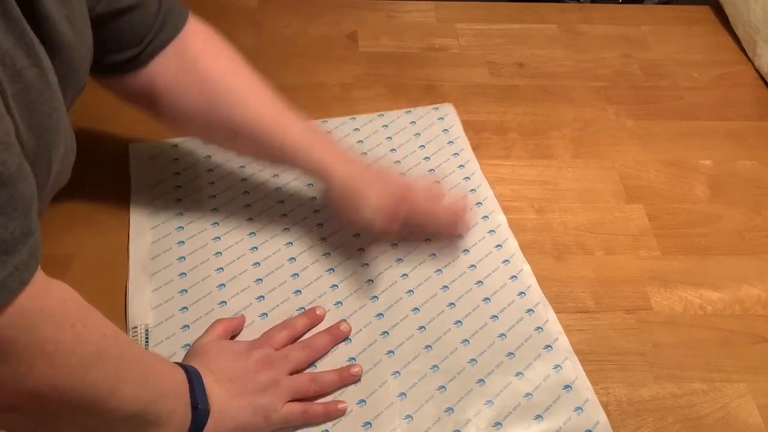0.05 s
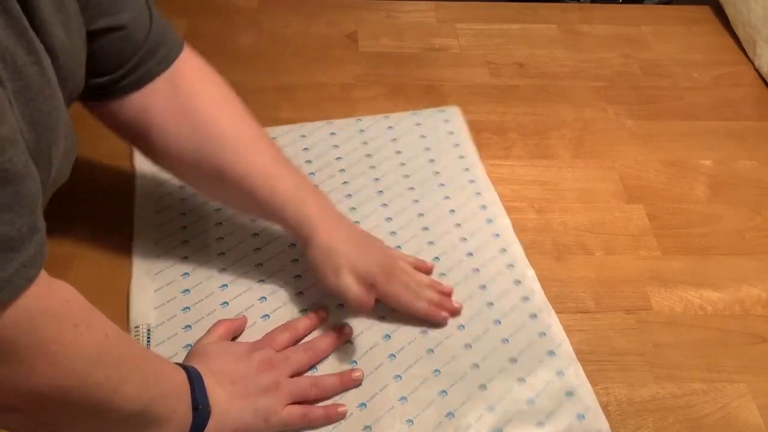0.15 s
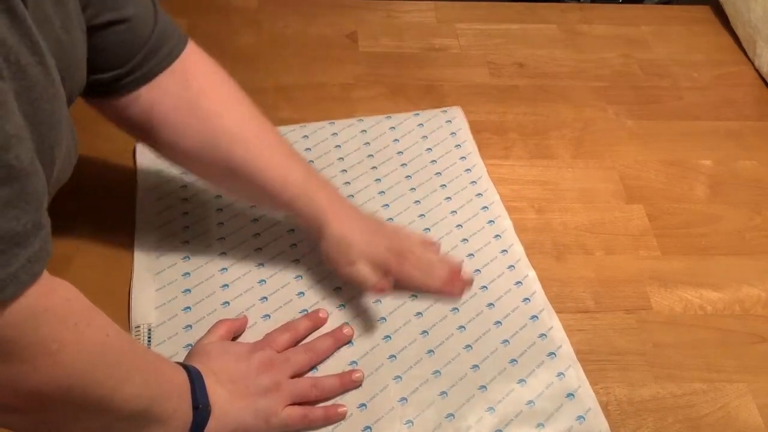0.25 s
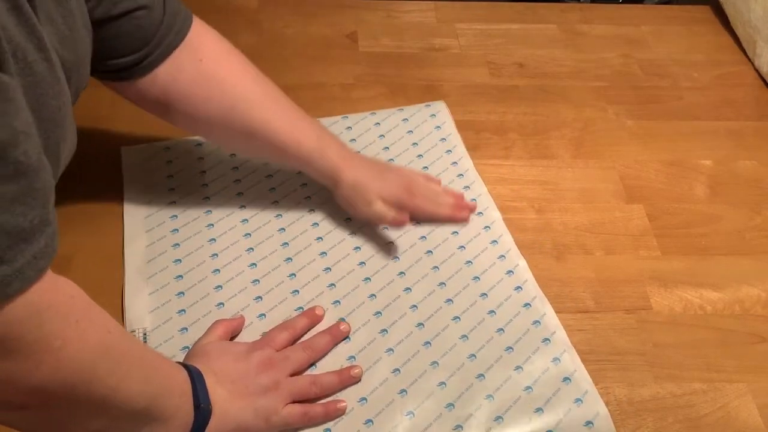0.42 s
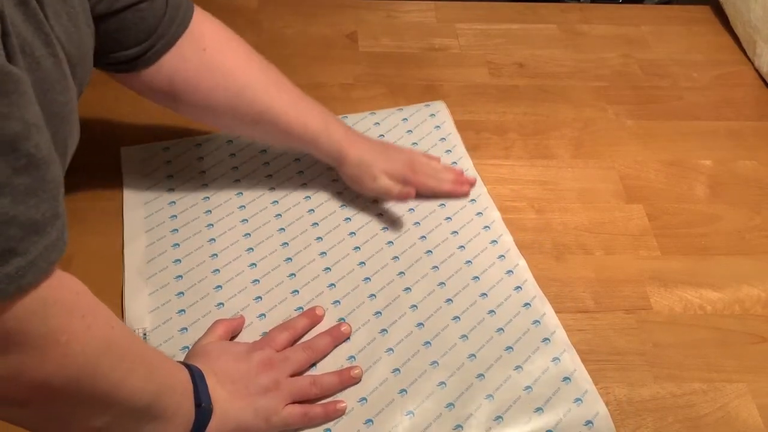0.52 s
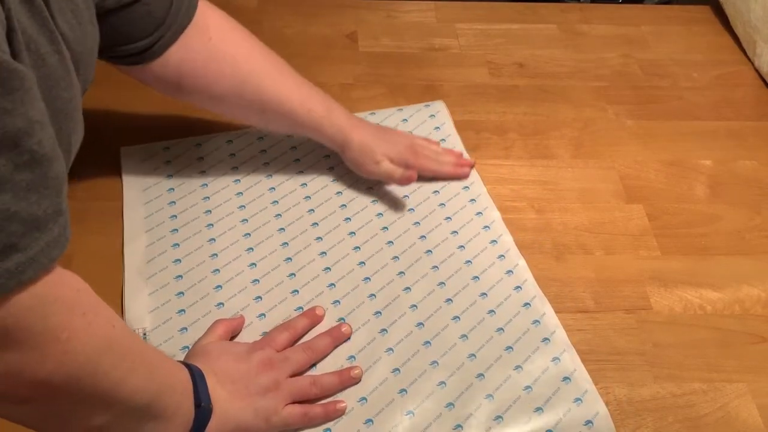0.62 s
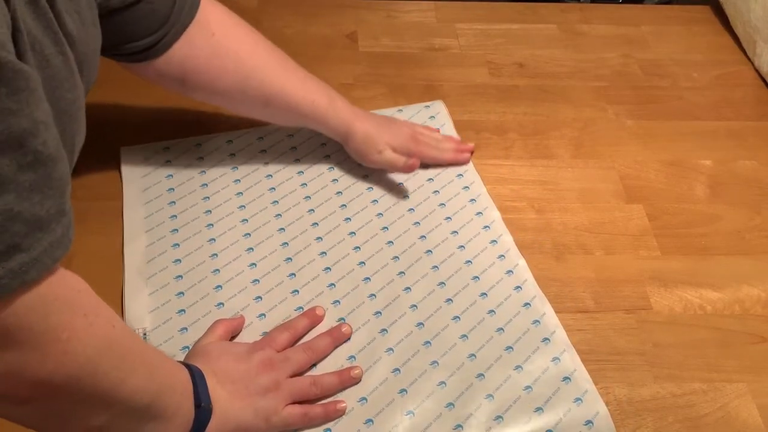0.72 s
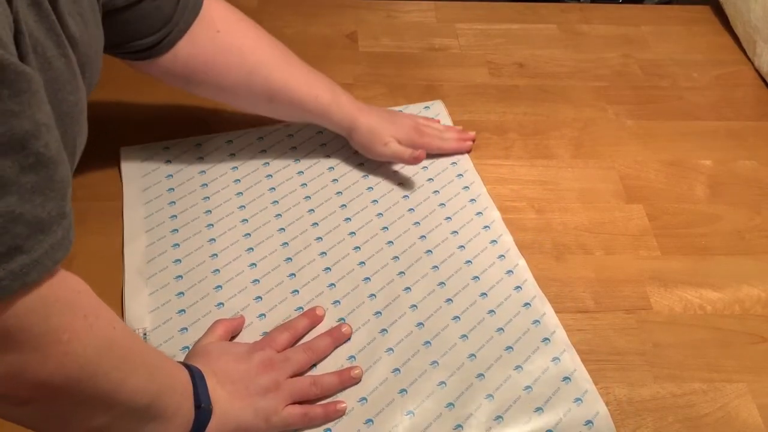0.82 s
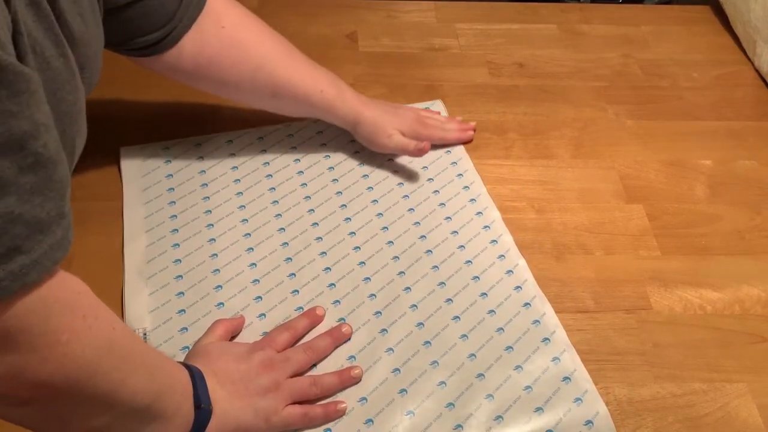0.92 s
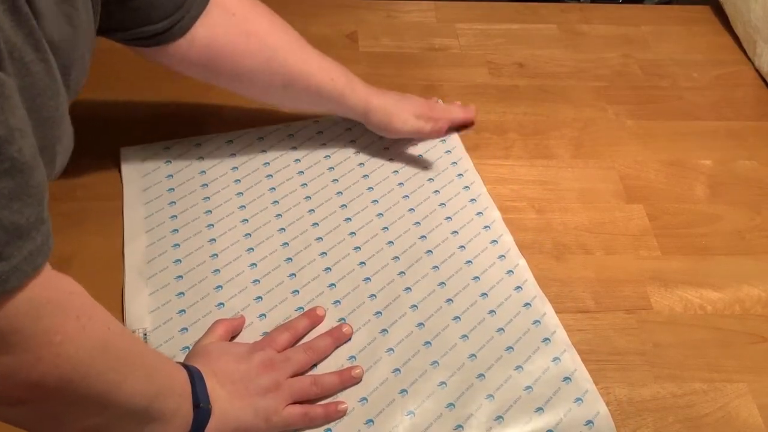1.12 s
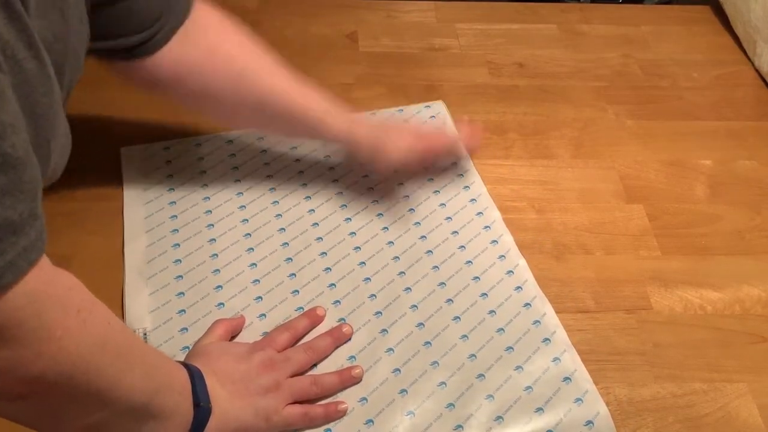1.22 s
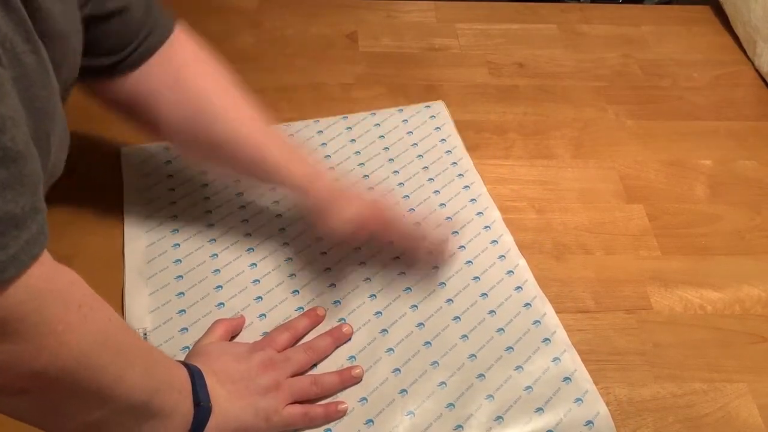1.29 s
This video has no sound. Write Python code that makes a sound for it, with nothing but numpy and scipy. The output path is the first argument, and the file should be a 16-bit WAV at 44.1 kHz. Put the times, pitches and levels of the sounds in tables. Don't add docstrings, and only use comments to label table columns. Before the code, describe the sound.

A palm lands on a thin plastic sheet on a wooden table and sweeps with a bright hiss; creases snap sharply, the rubbing fades, fingertips patter, all close to one microphone in a quiet, faintly humming room.

```python
import sys
import numpy as np
from scipy import signal
from scipy.fft import rfft, irfft, next_fast_len
from scipy.io import wavfile
from scipy.ndimage import uniform_filter1d, map_coordinates

SR = 44100
rng = np.random.default_rng(int(sys.argv[2]) if len(sys.argv) > 2 else 0)


def wrap_up_sound(samples):
    columns = np.atleast_2d(samples).T
    tamed = np.clip(columns, -1, 1)
    steps = np.round(tamed * 32767).astype(np.int16)
    wavfile.write(sys.argv[1], SR, steps)


def boost(x):
    u = np.asarray(x, float) / 20
    return 10 ** u


N = 59535


def unit(x):
    return x / np.sqrt(np.mean(x ** 2) + 1e-20)


def along(points, hz):
    point_hz, value = np.transpose(points)
    return np.interp(np.log(hz + 1), np.log(point_hz + 1), value)


def curves(rows):
    time_s, *columns = np.transpose(rows)
    return [np.interp(np.arange(N) / SR, time_s, column) for column in columns]


def wobble(rate):
    return map_coordinates(rng.standard_normal(200), [np.arange(N) * rate / SR])


def filtered(x, response):
    size = next_fast_len(len(x) + 8192)
    return irfft(rfft(x, size) * response(np.fft.rfftfreq(size, 1 / SR)), size)[:len(x)]


def peak(f, hz, width_hz):
    damping = 1j * f * width_hz
    return damping / (hz * hz - f * f + damping)


def coloured(x, spectrum):
    low_end, high_end = (spectrum[0][0] * .7, -60), (spectrum[-1][0] * 1.015, -120)
    closed = [low_end] + list(spectrum) + [high_end]
    return unit(filtered(x, lambda f: boost(along(closed, f))))


def patchy(depth_db):
    z = signal.stft(rng.standard_normal(N + 512), nperseg=512)[2]
    field = uniform_filter1d(rng.standard_normal(z.shape), size=6, axis=0)
    field = uniform_filter1d(field, size=8, axis=1)
    return unit(signal.istft(z * boost(depth_db * unit(field)), nperseg=512)[1][:N])


def burst(t60):
    count = 1500
    x = rng.standard_normal(count) * boost(-60 * np.arange(count) / SR / t60)
    x[0] = 3.55
    return x


def add(track, s, x):
    part = track[round(s * SR):][:len(x)]
    part += x[:len(part)]


# pitch_hz, level_db (rms), width_hz
HUM_PARTIALS = [(58.9, -71, 7.1), (120.1, -60.5, 4.94), (218.3, -67, 4), (246.2, -68, 13.6),
                (293.8, -71.5, 8), (523, -72, 11)]


def hum():
    t = np.arange(N) / SR
    out = np.zeros(N)
    for hz, db, width_hz in HUM_PARTIALS:
        drift_cycles = np.cumsum(wobble(40.07)) * width_hz / SR
        tone = np.sqrt(2) * np.sin(2 * np.pi * (hz * t + drift_cycles))
        out += boost(db + 0.53 * wobble(11.7)) * tone
    return out


# frequency_hz, level_db (per Hz)
AIR_SPECTRUM = [(28, -25), (55, 0), (95, -2), (160, -7.5), (270, -7.5), (600, -12.5), (1600, -17.5),
                (3700, -27.5)]
AIR_DB = -59.5


def air():
    return boost(AIR_DB + 1.4 * wobble(13.73)) * coloured(patchy(depth_db=1.5), AIR_SPECTRUM)


# frequency_hz, level_db (per Hz)
HISS_SPECTRUM = [(3000, 0), (5000, 5), (9000, -4), (15800, -4)]
HISS_DB = -80


def hiss():
    return boost(HISS_DB) * coloured(patchy(depth_db=0.0), HISS_SPECTRUM)


# time_s, hum_gain_db, air_gain_db
SUPPRESSION = [(0, 3.5, -1.5), (.12, -1.5, 0.5), (.21, -1.5, 1.5), (.3, -7, -1), (.6, -3.5, 0),
               (.8, 0, -1.8), (1.2, -0.8, 0.5), (1.26, -7.5, 1), (1.35, -3, -3)]


def background():
    hum_gain_db, air_gain_db = curves(SUPPRESSION)
    return boost(hum_gain_db) * hum() + boost(air_gain_db) * air() + hiss()


# frequency_hz, t60_s
ROOM_DECAY = [(200, 0.178), (3000, 0.093), (12000, 0.11)]


def room(x):
    hz, t, z = signal.stft(rng.standard_normal(SR // 2), SR, nperseg=256)
    decay = boost(-60 * t / along(ROOM_DECAY, hz)[:, None])
    tail = signal.istft(z * decay, SR, nperseg=256)[1]
    delayed = np.pad(x, (60, 0))
    return signal.fftconvolve(delayed, tail / np.linalg.norm(tail))[:N]


# frequency_hz, level_db (per Hz)
GLITCH_SPECTRUM = [(4050, -40), (4200, -2), (6850, 2), (6950, -42)]
GLITCH_S, GLITCH_LENGTH_S, GLITCH_DB = .556, 0.042, -60.5


def glitch():
    u = np.clip((np.arange(N) / SR - GLITCH_S) / GLITCH_LENGTH_S, 0, 1)
    noise = coloured(rng.standard_normal(N), GLITCH_SPECTRUM)
    return boost(GLITCH_DB) * np.sin(np.pi * u) * noise * [[1], [-1]]


GROAN_S, GROAN_LENGTH_S, GROAN_DB = .77, .12, -58.5
GROAN_FROM_HZ, GROAN_TO_HZ = 218, 260


def groan():
    u = np.clip((np.arange(N) / SR - GROAN_S) / GROAN_LENGTH_S, 0, 1)
    hz = GROAN_FROM_HZ + (GROAN_TO_HZ - GROAN_FROM_HZ) * u
    return boost(GROAN_DB) * np.sin(np.pi * u) * np.sin(2 * np.pi * np.cumsum(hz) / SR)


# start_s, level_db (peak)
THUMPS = [
    (.2485, -46.5),
    (1.186, -53.5),
    (0.48, -54.5),
]
# pitch_hz, level_db, t60_s
TABLE_MODES = [(89, 7.5, 0.12), (191, 0.5, 0.11), (257, 2, 0.086), (300.2, 10, 0.073), (372, 5, 0.06),
               (802, 4.5, 0.032)]


def thumps():
    out, t = np.zeros(N), np.arange(SR // 4) / SR
    ring = sum(boost(db - 60 * t / t60) * np.sin(2 * np.pi * hz * t) for hz, db, t60 in TABLE_MODES)
    ring *= 1 - np.exp(-t / 0.0049)
    for s, db in THUMPS:
        add(out, s, boost(db) * ring)
    return out


# start_s, level_db (peak), nail_brightness_db (per octave)
TAPS = [
    (1.181, -50, -1),
    (1.1817, -40, -2),
    (1.1843, -44.5, 0),
    (1.1858, -49, 0),
    (1.1940, -43, 11),
    (1.1954, -40.5, -4.5),
    (1.1975, -48, -2),
    (1.2060, -49.5, -4),
    (1.2074, -47.5, -8),
]
# pitch_hz, width_hz, level_db
TAP_RESONANCES = [(900, 380, -3.5), (1170, 430, 4.5), (2200, 1200, -11.5), (3400, 780, 2), (4850, 1300, -5),
                  (6570, 1530, -11.5)]
TAP_T60_S, TAP_PIVOT_HZ = 0.0044, 2000


def taps():
    out = np.zeros(N)
    for s, db, tilt_db in TAPS:
        def touch(f):
            total, sign = 0, 1
            for hz, width_hz, level_db in TAP_RESONANCES:
                gain_db = level_db + tilt_db * np.log2(hz / TAP_PIVOT_HZ)
                total = total + sign * boost(gain_db) * peak(f, hz, width_hz) ** 2
                sign = -sign
            return total
        x = filtered(burst(TAP_T60_S), touch)
        add(out, s, boost(db) * x / np.abs(x).max())
    return out


# start_s, level_db (peak),
# pitch_hz, width_hz, t60_s
SNAPS = [(.02255, -39.5, 3000, 3200, .001), (0.0229, -48.5, 6000, 3000, .001),
         (0.0226, -46.5, 1900, 1290, 0.0038), (.2397, -35.5, 2950, 1500, 0.0017),
         (0.2404, -35, 4660, 3500, .002), (0.2438, -39, 2700, 1100, 0.0022),
         (.2447, -43, 1700, 1500, 0.0067), (0.2444, -32, 3630, 1000, 0.0023),
         (.2451, -36.5, 6500, 5040, .003), (.2520, -40, 4800, 2000, .003), (0.2568, -41, 4300, 2000, .003),
         (0.3749, -42, 2600, 2000, .003), (.376, -33, 12500, 5000, .004),
         (.4198, -31.5, 11800, 5000, .0028), (.4225, -35, 10000, 8900, .004),
         (.4240, -24, 8200, 3000, .003), (.42370, -11.5, 9300, 9500, .0006),
         (.4240, -25, 10700, 3000, .003), (.4238, -27, 4900, 2500, .003),
         (0.4247, -23, 10000, 9570, 0.0044), (0.4252, -19, 8500, 7040, .004),
         (0.4261, -28.5, 4400, 1000, .004), (0.4266, -34, 2250, 1020, .010), (0.429, -26, 9500, 8000, .005),
         (0.4277, -29.5, 3400, 1500, .004), (0.4283, -45.5, 1070, 600, 0.0046),
         (0.4305, -26.5, 10500, 8200, .012), (.4316, -39, 4600, 1200, 0.0065),
         (0.441, -35.5, 8300, 1800, 0.0037), (.4763, -28.5, 7800, 3060, .003),
         (.4780, -34.5, 7400, 2000, .002), (.4825, -39.5, 13000, 5020, .002),
         (0.491, -35, 8500, 4000, .002), (0.4907, -31, 5000, 6060, .002), (1.3342, -55.5, 2510, 2540, .004),
         (.2520, -43.5, 300, 130, 0.022), (0.399, -50, 380, 221, 0.025), (.4260, -47.5, 420, 304, 0.02),
         (.4262, -35, 2350, 900, 0.0049)]


def snaps():
    out = np.zeros(N)
    for s, db, hz, width_hz, t60 in SNAPS:
        x = filtered(burst(t60), lambda f: peak(f, hz, width_hz) ** 3)
        add(out, s, boost(db) * x / np.abs(x).max())
    return out


GRIT_PER_S, GRIT_SPREAD_DB, GRIT_SHARE = 3000, 4, 0.21


def slip():
    hits = rng.random(N) < GRIT_PER_S / SR
    strength = boost(GRIT_SPREAD_DB * rng.standard_normal(N))
    grit = hits * np.sign(rng.standard_normal(N)) * strength
    return np.sqrt(1 - GRIT_SHARE) * patchy(depth_db=1.0) + np.sqrt(GRIT_SHARE) * unit(grit)


# time_s, rubbing_strength_db, speed_db (extra sizzle), pressure_db (extra body)
SWEEP = [(0, -67.5, -10, 0.5), (.035, -71.5, -9, -1), (.062, -89.5, -3, 12.5), (.212, -91, -3, 9),
         (.234, -61, -16, -0.5), (.256, -53, -7.5, -4.5), (.285, -60.5, -9, -3), (.305, -58, -0.5, -6.5),
         (.37, -52, -0.5, -2.5), (.47, -51, 1.5, 1.5), (.55, -59, 2.5, 1), (.66, -59, 1, -1.5),
         (.87, -62.5, -1, -1), (.96, -63, -9.5, -2.5), (1.125, -66, -10, 0.5), (1.176, -77.5, -3.5, 6),
         (1.235, -67.5, -10, -1), (1.265, -91, 1, -7)]
# frequency_hz, level_db (per Hz)
RUB_SPECTRUM = [(3300, -28), (4200, -3), (5200, 1), (6300, 0), (7500, -0.9), (8400, -13.5), (9200, -39)]
# frequency_hz, level_db (per Hz)
SIZZLE_SPECTRUM = [(7000, -31.5), (8300, 1.5), (10500, 0.5), (13000, -1), (15500, -3), (15800, -8.5)]
# frequency_hz, level_db (per Hz)
BODY_SPECTRUM = [(350, -10.5), (900, -7.5), (1500, -1.5), (2000, -3), (2500, -5.5), (3000, 3), (3700, 0.8),
                 (5500, -14.5)]
RUB_DB, BODY_DB, SIZZLE_DB = -0.2, 1, -1.06


def sweep():
    strength_db, speed_db, pressure_db = curves(SWEEP)
    rub = boost(RUB_DB) * coloured(slip(), RUB_SPECTRUM)
    sizzle = boost(speed_db + SIZZLE_DB) * coloured(slip(), SIZZLE_SPECTRUM)
    body = boost(pressure_db + BODY_DB) * coloured(slip(), BODY_SPECTRUM)
    return boost(strength_db + 0.4 * wobble(60.1)) * (rub + sizzle + body)


ROOM_DB, TAP_ROOM_DB = -6.5, -10.5


def scene():
    steady = background() + groan() + sweep()
    touches = taps() + thumps()
    creases = snaps()
    answer = room(boost(ROOM_DB) * creases + boost(TAP_ROOM_DB) * touches)
    mono = creases + touches + answer + steady
    return np.array([mono, mono])


def low_pass(x):
    return signal.sosfilt(signal.butter(12, 16970, fs=SR, output="sos"), x)


TOP_HZ, END_HZ, OVER_TOP_DB = 15900, 16900, -20
PIERCE_DB = -28


def record(dry):
    x = dry[0]
    loud = np.sqrt(np.abs(uniform_filter1d(x ** 2, size=300))) > boost(PIERCE_DB)
    opening = uniform_filter1d(loud * 1., size=200)
    treble = filtered(x, lambda f: (f >= TOP_HZ) * (f < END_HZ))
    limited = filtered(x, lambda f: f < TOP_HZ)
    return low_pass(limited + boost(OVER_TOP_DB) * opening * treble + glitch())


dry = scene()
out = record(dry)
wrap_up_sound(out)
```